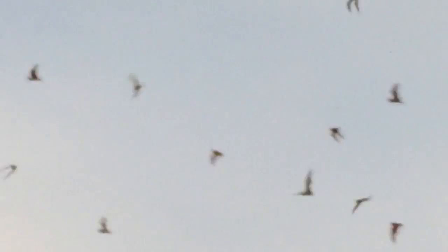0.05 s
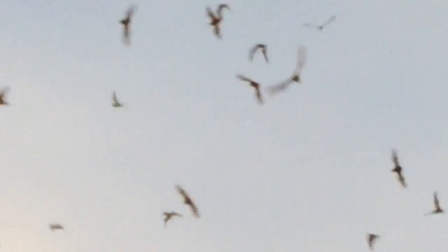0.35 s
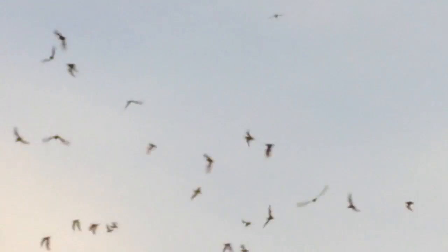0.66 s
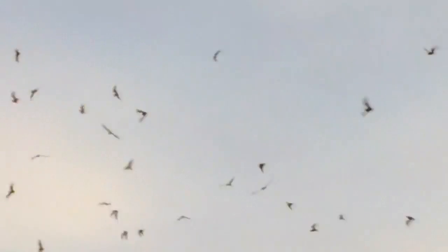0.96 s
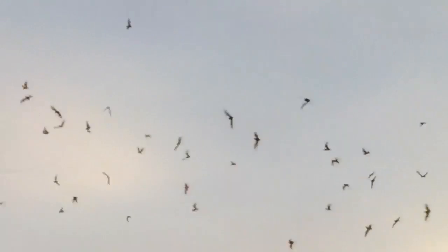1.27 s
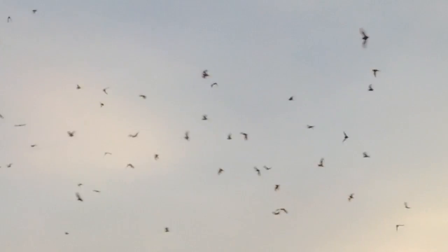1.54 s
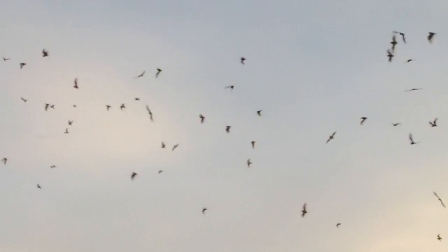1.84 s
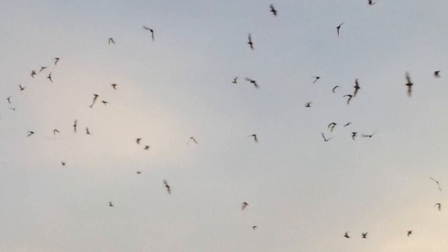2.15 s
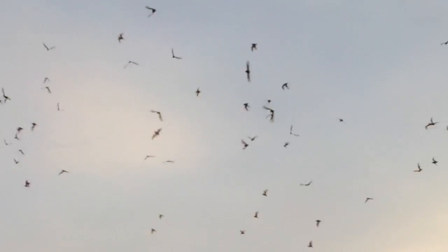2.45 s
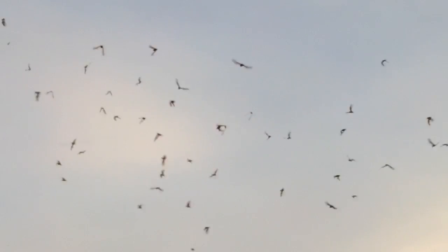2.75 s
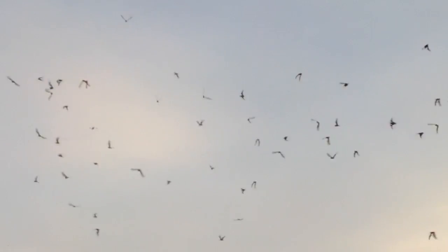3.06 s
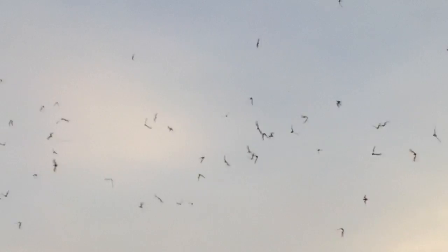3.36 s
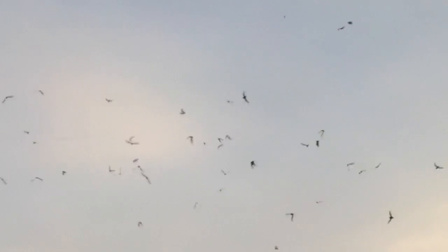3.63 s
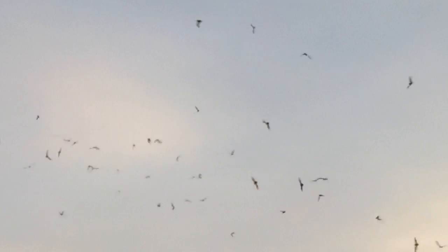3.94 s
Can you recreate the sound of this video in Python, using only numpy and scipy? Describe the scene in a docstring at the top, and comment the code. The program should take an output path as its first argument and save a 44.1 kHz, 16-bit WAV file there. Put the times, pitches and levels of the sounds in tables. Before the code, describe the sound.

Bats chatter in short high buzzes overhead above a distant light aircraft's drone.

```python
"""Bats at dusk. From the start: faint outdoor air, a distant piston engine (probably a light aircraft)
slowly sinking in pitch, and the hiss and sonar chirps of a stream of bats overhead.
At 0.17 s come the first of a few small ticks near the microphone; from 0.25 s nearer bats chatter
in short high buzzes, each a rapid pulse train. A faint far peep follows at 0.65 s.
The ticks end at 2.6 s; one soft close bump sounds at 3.4 s, and the chatter runs on to the end."""
import sys
import numpy as np
from scipy import signal
from scipy.fft import rfft, irfft
from scipy.io import wavfile

SR = 44100
rng = np.random.default_rng(int(sys.argv[2]) if len(sys.argv) > 2 else 0)


def wav_record(signal):
    """Record a signal, one row per channel, as 16-bit PCM in the file named by sys.argv[1]."""
    frames = np.transpose(np.atleast_2d(signal))
    bounded = np.clip(frames, -1, 1)
    # unit amplitude maps onto the largest positive 16-bit level
    quanta = np.round(bounded * 32767).astype(np.int16)
    wavfile.write(sys.argv[1], SR, quanta)


N = 176400
TIME_S = np.arange(N) / SR


def amp(db):
    """Decibels to gain."""
    return 10 ** (np.asarray(db) / 20)


def unit_rms(x):
    """Scale to rms 1."""
    return x / np.sqrt(np.mean(x ** 2) + 1e-20)


def curve(points):
    """Interpolate (t/s, value) points over the scene."""
    return np.interp(TIME_S, *np.transpose(points))


def spectrum(points, hz):
    """Gain at hz from (f/Hz, level/dB) points on a log-frequency axis."""
    f, db = np.transpose(points)
    return amp(np.interp(np.log(hz + 1), np.log(f + 1), db))


def noise(points):
    """Noise of rms 1 with the given spectrum, rolled off below its first point."""
    hz = np.fft.rfftfreq(N, 1 / SR)
    low_cut = np.minimum(hz / points[0][0], 1) ** 2
    return unit_rms(irfft(rfft(rng.standard_normal(N)) * spectrum(points, hz) * low_cut, N))


def wander(rate_hz):
    """Smooth random drift of rms 1, up to about rate_hz."""
    t = TIME_S[::128]
    hz = np.fft.rfftfreq(len(t), t[1])
    low_pass = np.exp(-(hz / rate_hz) ** 2) * (hz > 0)
    drift = irfft(rfft(rng.standard_normal(len(t))) * low_pass, len(t))
    return np.interp(TIME_S, t, unit_rms(drift))


def add(mix, start_s, sound):
    """Mix a sound in at start_s."""
    part = mix[max(round(start_s * SR), 0):][:len(sound)]
    part += sound[:len(part)]


def echo(x, t60_s=.34, delay_s=.0043):
    """Diffuse scatter from ground and surroundings."""
    t = TIME_S[:SR // 2]
    tail = rng.standard_normal(len(t)) * np.exp(-np.log(1000) * t / t60_s) * (t > delay_s)
    return signal.fftconvolve(x, tail / np.linalg.norm(tail))[:N]


# Air spectrum: f/Hz, relative level/dB
AIR_SPECTRUM = [(15, -5), (35, 2.5), (65, 2), (110, 5), (180, 3), (250, -3), (400, -3), (600, -7.5),
                (1000, -13), (1800, -18.5), (3000, -26), (5000, -27.5), (16000, -29)]
# Air envelope: t/s, level/dB
AIR_ENVELOPE = [(0, -59.5), (.7, -57.5), (1.3, -58), (1.75, -57), (2.3, -58), (3, -57.5), (4, -59)]


def air():
    """Outdoor air: low rumble and faint hiss, slightly unsteady."""
    return amp(curve(AIR_ENVELOPE) + .7 * wander(rate_hz=13)) * noise(AIR_SPECTRUM)


# Firing rate: t/s, f/Hz
FIRING_RATE = [(0, 132.5), (.8, 131), (1.7, 130), (2.9, 128.5), (4, 126.8)]
# Firing tone envelope: t/s, level/dB
FIRING_ENVELOPE = [(0, -45), (.35, -41.5), (.72, -44.3), (1.15, -39.5), (1.6, -38.5), (2.3, -38),
                   (3.0, -37.5), (3.5, -39), (4, -40)]
# Breakpoints of the strong partials: t/s
PARTIAL_TIMES_S = [.35, 1.35, 2.4, 3.65]
# Strong partials: multiple of the cycle rate, level/dB at each breakpoint
STRONG_PARTIALS = [(8, -59.5, -57.5, -55.5, -57), (9, -63.5, -60.5, -61, -62), (12, -75, -62.5, -57.5, -66),
                   (14, -65, -58.5, -55.5, -61.5), (15, -67, -61.5, -65.5, -69), (16, -63, -60, -53.5, -62),
                   (17, -69, -68.5, -60.5, -71), (18, -60.5, -58.5, -63, -98), (22, -72.5, -65, -60.5, -68),
                   (24, -67, -67, -62.5, -77), (26, -71, -75, -65.5, -79), (32, -66, -67, -70, -69)]
# Spectrum of the remaining partials: f/Hz, level/dB
WEAK_SPECTRUM = [(150, -73.5), (280, -79.5), (450, -81.5), (620, -79), (850, -82), (1300, -93.5)]


def engine(cylinders=6, waver_db=2, scatter_rad=1.16):
    """Clean firing tone; unequal cylinders add partials that waver on their way through the air."""
    cycle_hz = curve(FIRING_RATE) / cylinders
    cycle_rad = 2 * np.pi * np.cumsum(cycle_hz) / SR
    drone = amp(curve(FIRING_ENVELOPE)) * np.cos(cylinders * cycle_rad)
    strong_db = {round(order): levels for order, *levels in STRONG_PARTIALS}
    for order in range(cylinders + 1, 52):
        if order in strong_db:
            gain = amp(np.interp(TIME_S, PARTIAL_TIMES_S, strong_db[order]))
        else:
            gain = spectrum(WEAK_SPECTRUM, order * cycle_hz.mean())
        waver = amp(waver_db * wander(rate_hz=2.47))
        drone += gain * waver * np.cos(order * cycle_rad + scatter_rad * rng.standard_normal())
    return np.sqrt(2) * drone  # rms to peak


# Far swarm spectrum: f/Hz, relative level/dB
SWARM_SPECTRUM = [(3000, -23), (6300, -11.5), (7400, -7), (8600, 0.5), (10200, 2), (12500, -1.5),
                  (14200, -6), (16000, -1)]


def swarm(level_db=-59.5, flutter_db=1.17):
    """Far bats merge into a fluttering hiss."""
    return amp(level_db + flutter_db * wander(rate_hz=45)) * noise(SWARM_SPECTRUM)


def sonar(chirps_per_s=45, length_s=.003, top_hz=18700, end_range_hz=(8900, 15100)):
    """The low ends of sonar chirps dive into hearing at random times."""
    chirps = np.zeros(N)
    progress = np.arange(0, length_s, 1 / SR) / length_s
    envelope = np.sin(np.pi * progress)
    for when, shallowness, distance in rng.random((int(chirps_per_s * N / SR), 3)):
        end_hz = np.interp(np.sqrt(shallowness), (0, 1), end_range_hz)
        hz = top_hz * (end_hz / top_hz) ** progress
        sweep = np.sin(2 * np.pi * np.cumsum(hz) / SR)
        level_db = -61 - 3 * np.log(distance + .044)
        add(chirps, when * N / SR, amp(level_db) * envelope * sweep)
    return chirps


def scuff(lead_s, rise_s, decay_s, colour):
    """Brief noise burst that peaks at lead_s and rings with the given spectrum."""
    t = TIME_S[:4096] - lead_s
    envelope = np.exp(-np.maximum(-t / rise_s, t / decay_s))
    burst = envelope * rng.choice([-1., 1.], len(t))
    ring = irfft(rfft(burst) * spectrum(colour, np.fft.rfftfreq(len(t), 1 / SR)))
    return ring * np.linalg.norm(envelope) / np.linalg.norm(ring)


# Ticks: peak t/s, rise/s, decay/s, knock level/dB, snap level/dB
TICK_EVENTS = [(.169, .0003, 0.0011, -70, -39.5), (0.182, .011, 0.006, -60, -46.5),
               (1.187, 0.0012, 0.0023, -60, -50), (1.466, 0.004, 0.0023, -60, -48.5),
               (1.4694, 0.00034, 0.00073, -38.5, -40), (1.8968, 0.0014, 0.0014, -38.5, -52),
               (2.586, .001, 0.0018, -73, -56)]
# Knock spectrum: f/Hz, relative level/dB
KNOCK_SPECTRUM = [(300, -17), (750, 0), (1250, 6.5), (2100, -5), (3200, -13.5), (8000, -34)]
# Snap spectrum: f/Hz, relative level/dB
SNAP_SPECTRUM = [(1000, -29), (3200, -12.5), (4500, -2.5), (6000, 0.5), (8000, -2.5), (11000, -3),
                 (14000, -3), (16000, -3.5)]


def ticks(lead_s=.05):
    """Small close ticks, each a midrange knock plus a bright snap."""
    track = np.zeros(N)
    for peak_s, rise_s, decay_s, knock_db, snap_db in TICK_EVENTS:
        knock = amp(knock_db) * scuff(lead_s, rise_s, decay_s, KNOCK_SPECTRUM)
        snap = amp(snap_db) * scuff(lead_s, rise_s, decay_s, SNAP_SPECTRUM)
        add(track, peak_s - lead_s, knock + snap)
    return track


def pulse_train(t, length_s, rasp, centre_hz, sigma_s=.00036, glide_hz_per_s=410000):
    """Uneven, slowing train of rising pips, faster with rasp; returns pips and envelope at rms 1."""
    clean_per_s, raspy_per_s, slowing, jitter, spread_db = 220, 415, .25, .07, .4
    rate_per_s = raspy_per_s - (raspy_per_s - clean_per_s) * np.exp(-rasp / .1)
    gap_draw, level_draw, pitch_draw, phase_draw = rng.standard_normal((4, 40, 1))  # 40 pulses
    progress = np.arange(40)[:, None] / (rate_per_s * length_s)
    gaps_s = np.exp(slowing * np.minimum(progress - .5, 1) + jitter * gap_draw) / rate_per_s
    since_s = t - (np.cumsum(gaps_s, axis=0) - gaps_s[0] / 2)
    gates = amp(spread_db * level_draw) * np.exp(-.5 * (since_s / sigma_s) ** 2)
    pitch_hz = centre_hz * (1 + .017 * pitch_draw)
    cycles = pitch_hz * since_s + glide_hz_per_s * since_s ** 2 / 2 + phase_draw
    pips = gates * np.cos(2 * np.pi * cycles)
    return unit_rms(pips.sum(0)), unit_rms(gates.sum(0))


# Buzz overtone spectrum: f/Hz, relative level/dB
OVERTONE_SPECTRUM = [(5500, -55), (9000, -18), (10400, 2), (11800, 1.5), (13200, 0), (14400, -8.5),
                     (16000, -1)]


def buzz(length_s, rasp, centre_hz, voice_db, overtones_db):
    """One bat call: pips blended with pulsed resonant noise, under hissy overtones."""
    rasp_width_hz, gate_depth, ripple_db, ripple_hz = 1270, .57, 4, 2324
    t = np.arange(0, length_s * 1.017, 1 / SR)
    hz = np.fft.rfftfreq(len(t), 1 / SR)
    pips, throb = pulse_train(t, length_s, rasp, centre_hz)
    puffs = rfft(rng.standard_normal((2, len(t))) * (1 - gate_depth + gate_depth * throb))
    resonance = 1 / (1 + ((hz - centre_hz) / (2 * rasp_width_hz)) ** 2) ** 2
    low_cut = 1 / (1 + (6700 / (hz + 1)) ** 20)
    rasp_noise = unit_rms(irfft(puffs[0] * resonance * low_cut, len(t)))
    voice = np.sqrt(1 - rasp) * pips + np.sqrt(rasp) * rasp_noise
    ripple = amp(ripple_db * np.cos(2 * np.pi * (hz / ripple_hz + rng.random())))  # own peaks per call
    overtones = unit_rms(irfft(puffs[1] * spectrum(OVERTONE_SPECTRUM, hz) * ripple, len(t)))
    envelope = unit_rms(abs(np.sin(np.pi * (t / t[-1]) ** 1.19)) ** .85)  # peaks late
    return envelope * (amp(voice_db) * voice + amp(overtones_db) * overtones)


# Bat calls: t/s, core length/s, rasp share 0-1, resonance f/Hz, voice level/dB, overtone level/dB
BAT_CALLS = [(0.251, 0.03, 0.8, 9850, -58.5, -62), (0.288, 0.033, 1, 9100, -55, -60),
             (0.324, 0.037, 0.92, 8460, -57, -58), (0.365, 0.016, 0.24, 8530, -47.5, -55),
             (0.389, 0.039, 0.18, 8550, -46, -52), (0.478, 0.023, 0.52, 9540, -50, -59),
             (0.511, 0.028, 0.43, 9370, -51, -54), (0.537, 0.031, 0.06, 8900, -52, -59),
             (0.59, 0.048, 0.62, 8700, -61, -63), (0.97, 0.078, 0.82, 8800, -60, -66),
             (1.039, 0.073, 0.78, 8940, -58, -61), (1.118, 0.054, 0.76, 9170, -53, -53),
             (1.173, 0.041, 0.67, 9300, -49, -53.5), (1.217, 0.055, 0.9, 9400, -62, -61),
             (1.503, 0.024, 0.45, 8870, -64, -71), (1.542, 0.023, 0.43, 9200, -58, -67),
             (1.781, 0.035, 0.8, 8800, -59, -64), (1.819, 0.043, 0.66, 8600, -53, -59),
             (1.859, 0.042, 0.7, 8920, -52.5, -59), (1.91, 0.051, 1, 8880, -62, -68),
             (2.009, 0.02, 0.08, 8960, -54.5, -67), (2.038, 0.032, 0.07, 8980, -49.5, -67),
             (2.078, 0.027, 0.04, 8950, -48.5, -65), (2.29, 0.035, 0.76, 8740, -55, -57),
             (2.327, 0.041, 0.77, 9000, -53.5, -55.5), (2.369, 0.047, 0.85, 9200, -60.5, -64),
             (2.64, 0.02, 0.7, 8300, -61, -75), (2.671, 0.018, 0.4, 8600, -52, -67),
             (2.696, 0.033, 0.2, 8400, -54, -59), (2.863, 0.044, 0.83, 9550, -63.5, -65),
             (3.053, 0.02, 0.76, 8700, -57, -60), (3.084, 0.031, 0.36, 8500, -50.5, -51.5),
             (3.118, 0.046, 0.5, 8930, -47.5, -51.5), (3.159, 0.057, 0.4, 9000, -52.5, -73),
             (3.238, 0.018, 0.43, 8430, -47, -53), (3.269, 0.036, 0.34, 8730, -46.5, -52),
             (3.305, 0.018, 0.1, 9250, -45, -56), (3.335, 0.024, 0.02, 8880, -44.5, -62),
             (3.452, 0.021, 0.56, 8720, -57, -62), (3.481, 0.029, 0.7, 9000, -61.5, -63),
             (3.716, 0.041, 0.8, 8710, -56.5, -60), (3.762, 0.05, 0.74, 9000, -53.5, -56),
             (3.822, 0.045, 0.8, 9170, -61, -62), (3.868, 0.028, 0.85, 9100, -56, -57),
             (3.905, 0.034, 0.57, 8000, -51.5, -53.5), (3.943, 0.044, 0.55, 8260, -51, -56)]


def chatter(full_blur_s=.012, echo_db=-10.5, rasp_echo_db=7.5):
    """Nearer bats buzz; raspier calls swell earlier, fade later and carry more echo."""
    direct, scattered = np.zeros((2, N))
    for start_s, length_s, rasp, centre_hz, voice_db, overtones_db in BAT_CALLS:
        blur_s = full_blur_s * rasp
        call = buzz(length_s + 2 * blur_s, rasp, centre_hz, voice_db, overtones_db)
        add(direct, start_s - blur_s, call)
        add(scattered, start_s - blur_s, call * amp(echo_db + rasp_echo_db * rasp))
    return direct + echo(scattered)


def peep(peak_s=.65, half_width_s=.018, hz=1080, level_db=-55.5):
    """Faint far peep: a short sine burst."""
    envelope = np.exp(-((TIME_S - peak_s) / half_width_s) ** 2)
    return amp(level_db) * envelope * np.sin(2 * np.pi * hz * TIME_S)


# Bump spectrum: f/Hz, relative level/dB
BUMP_SPECTRUM = [(25, -3), (80, 4), (200, 1), (330, -8), (1200, -60)]


def bump(peak_s=3.362, half_width_s=.015, level_db=-48):
    """Soft close bump: a short swell of low noise."""
    envelope = np.exp(-((TIME_S - peak_s) / half_width_s) ** 2)
    return amp(level_db) * envelope * noise(BUMP_SPECTRUM)


def scene():
    """Mono mix; ticks and peep share one echo."""
    background = air() + engine() + swarm() + sonar()
    small_sounds = ticks() + peep()
    return (background + small_sounds + amp(-9) * echo(small_sounds) + chatter() + bump())[None]


def record(dry, cutoff_hz=15900):
    """Steep low-pass band limit."""
    low_pass = signal.firwin(511, cutoff_hz, window=("kaiser", 9), fs=SR)
    return signal.oaconvolve(dry, low_pass[None], "same")


dry = scene()
out = record(dry)
wav_record(out)
```